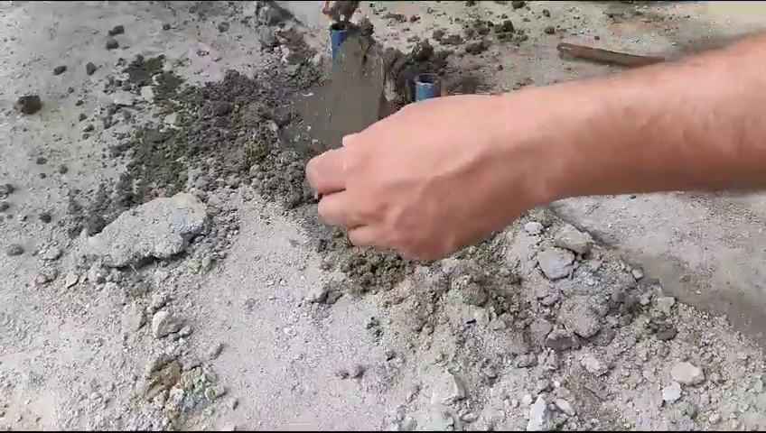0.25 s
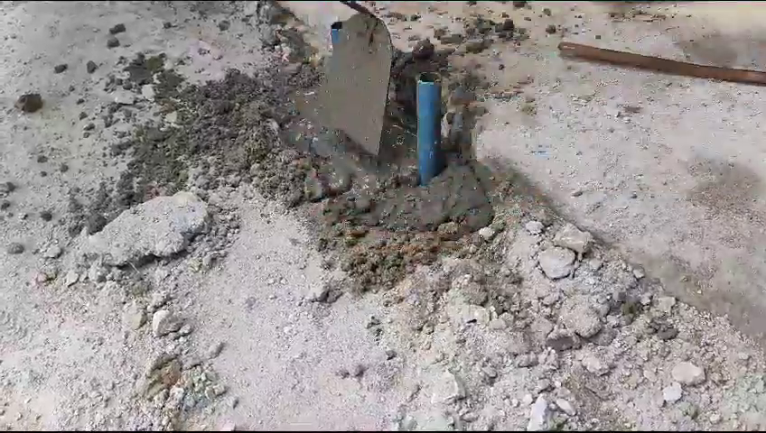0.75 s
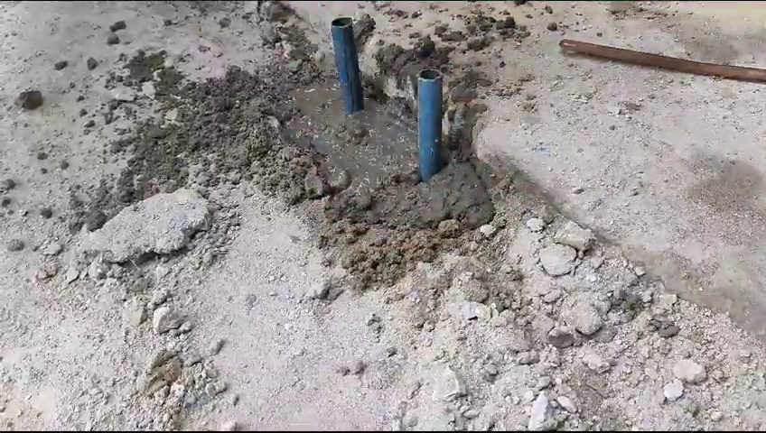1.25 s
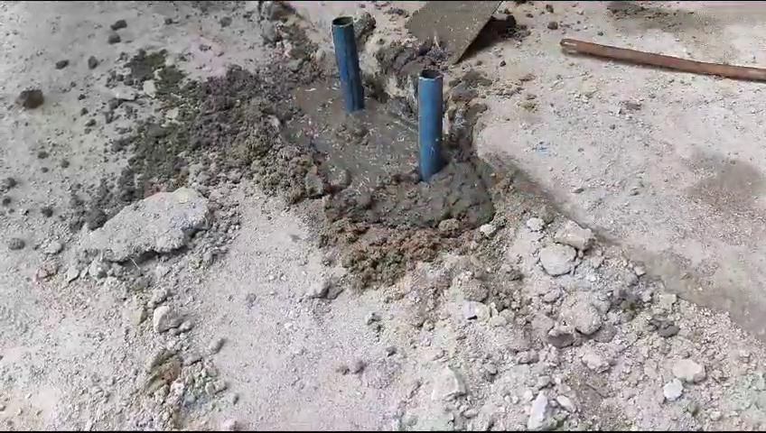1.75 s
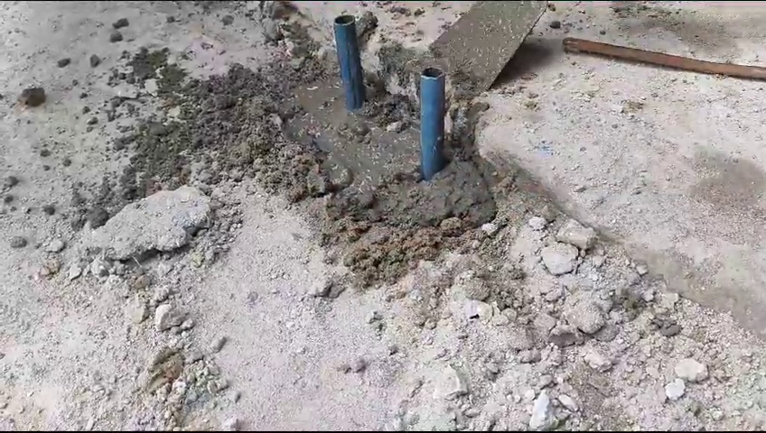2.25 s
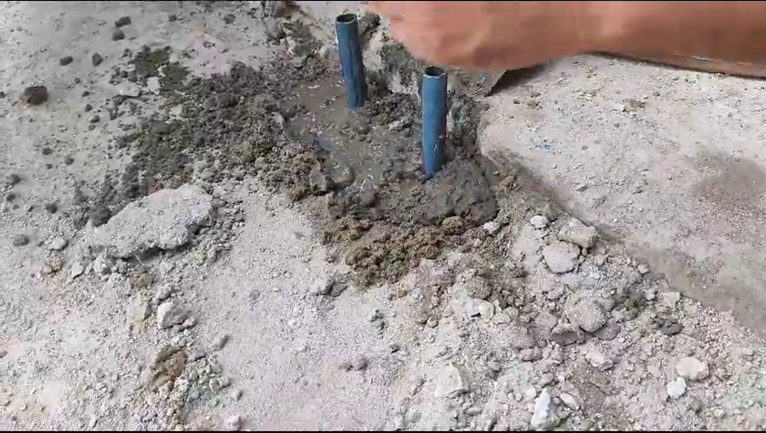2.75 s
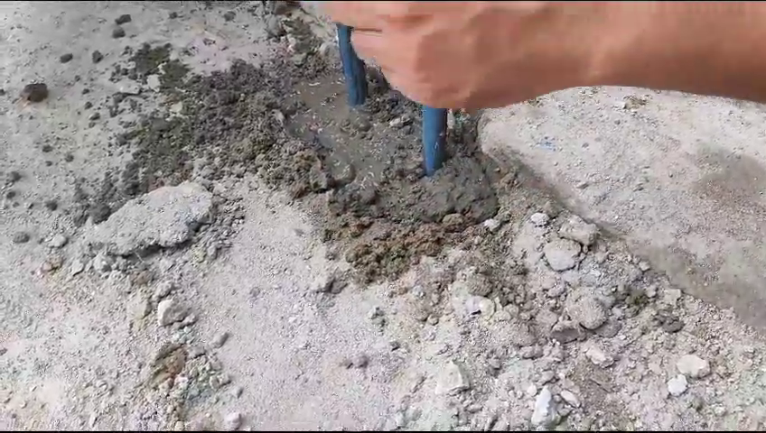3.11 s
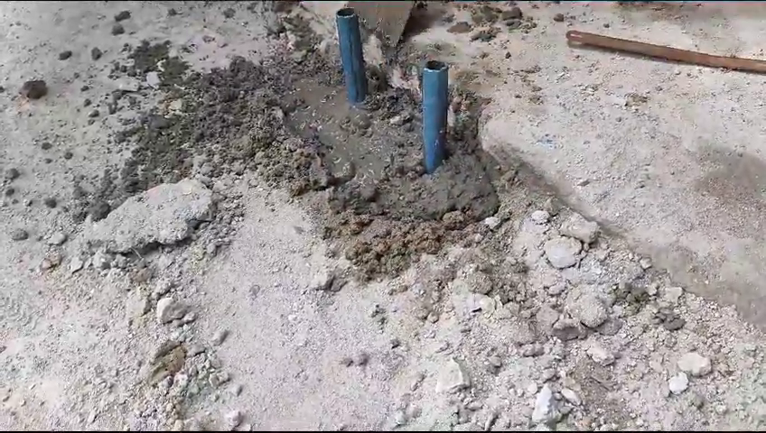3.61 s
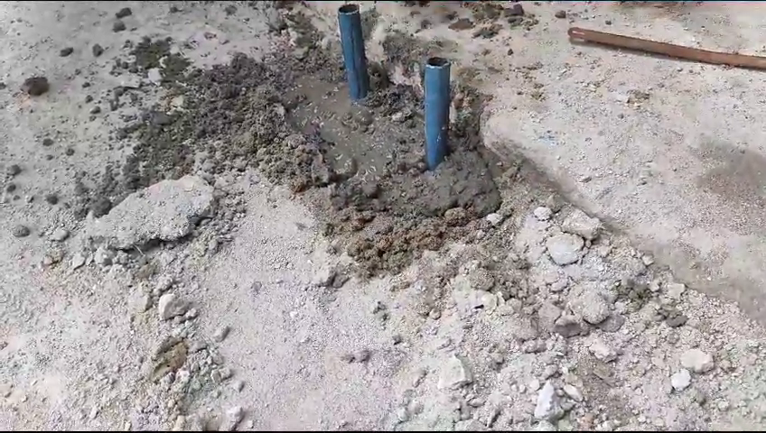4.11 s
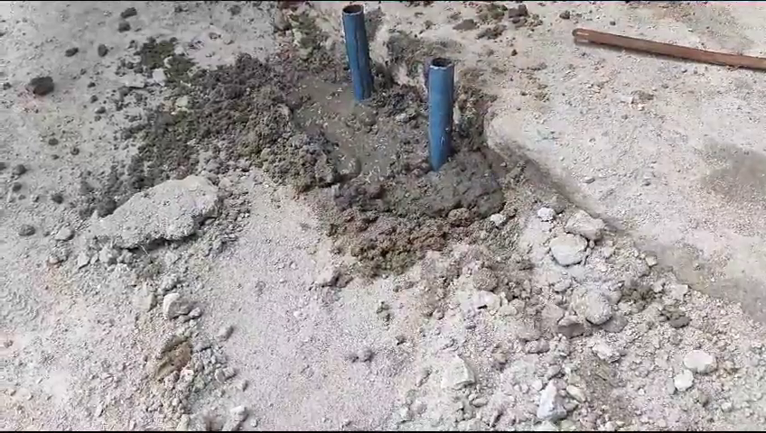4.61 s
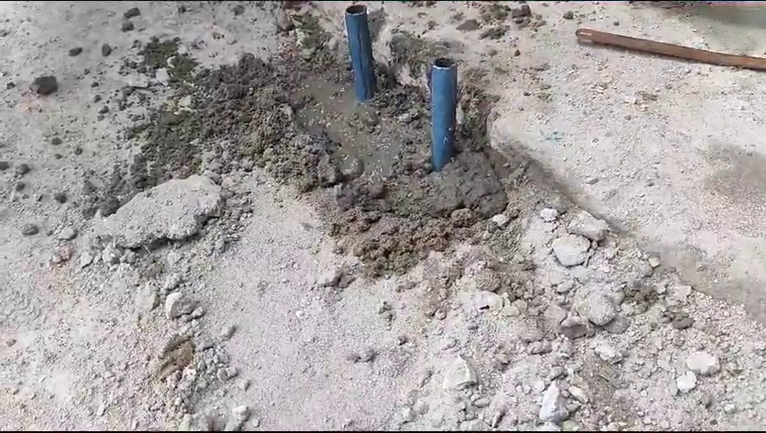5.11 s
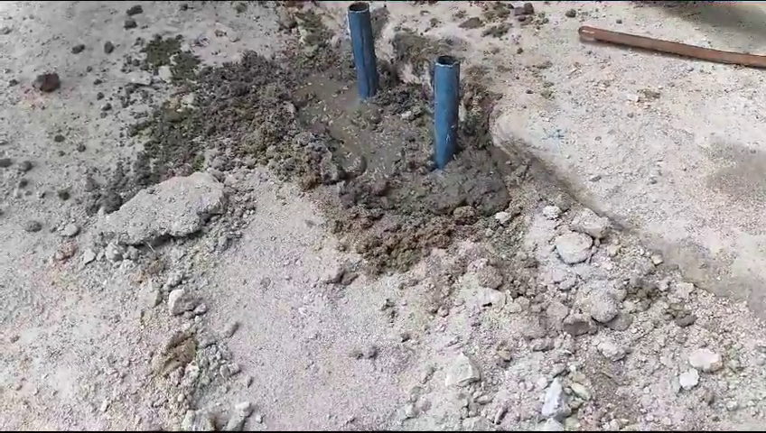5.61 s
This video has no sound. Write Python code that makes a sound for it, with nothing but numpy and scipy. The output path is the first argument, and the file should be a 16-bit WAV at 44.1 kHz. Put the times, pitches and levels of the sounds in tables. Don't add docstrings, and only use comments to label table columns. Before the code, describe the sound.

Close view of a small steel trowel in a bare, lightly echoing room. Short wet crunches pack mortar, then dry gritty scrapes rasp over concrete and the freed blade rings thinly. Two flat wipes and two quick taps follow, a pause, then a heavy drag and knocking digs. Low air rumble sits mostly right, small case ticks left.

```python
import sys
import numpy as np
from scipy import signal
from scipy.fft import rfft, irfft, next_fast_len
from scipy.io import wavfile
from scipy.ndimage import uniform_filter1d, map_coordinates

SR = 44100
rng = np.random.default_rng(int(sys.argv[2]) if len(sys.argv) > 2 else 0)


def materialize(psi):
    bounded = np.clip(np.atleast_2d(psi).T, -1, 1)
    quanta = np.round(bounded * 32767).astype(np.int16)
    wavfile.write(sys.argv[1], SR, quanta)


def voltage_ratio(decibels):
    exponent = np.asarray(decibels, float) / 20
    return 10 ** exponent


N = 258426

# start_s, end_s
SPELLS = [
    (0, 1.48),
    (1.38, 2.57),
    (2.477, 3.29),
    (3.19, 3.86),
    (3.863, 4.63),
    (4.584, 5.1),
    (5.015, 5.86),
]
# frequency_hz, density_db (per Hz)
GRIT_SCRAPE = [(180, -52), (300, -16), (455, -26), (555, -24.5), (842, -17.5), (2700, -9), (3830, -15),
               (4450, -26), (6410, -13), (7690, -8.5), (9390, -16.5), (12500, -17.5), (16000, -16.5)]
# frequency_hz, density_db (per Hz)
GRIT_DIG = [(180, -16.5), (300, 3), (392, -16), (624, -3.5), (1060, -43), (1510, 0.5), (1840, -13),
            (2360, -1), (3890, -14), (5520, -6.5), (8200, -9.5), (11900, -26.5), (16000, -18)]
# frequency_hz, width_hz, level_db
PRESSED_LOW = [(577, 39, -5), (690, 32, -11.5), (1230, 540, -13.5)]
PRESSED_DB = [-4.5, -3.5]


def unit(x):
    return x / np.sqrt(np.mean(abs(x) ** 2) + 1e-20)


def along(points, hz):
    f, v = np.transpose(points)
    return np.interp(np.log(hz + 1), np.log(f + 1), v)


def curves(rows, t):
    s, *cols = np.transpose(rows)
    return [np.interp(t, s, c) for c in cols]


def wobble(rate, size=N):
    knots = rng.standard_normal(int(size * rate / SR) + 4)
    return map_coordinates(knots, [np.arange(size) * rate / SR], order=2)


def filtered(x, response):
    n = x.shape[-1]
    m = next_fast_len(n + SR // 4)
    return irfft(rfft(x, m) * response(np.fft.rfftfreq(m, 1 / SR)), m)[..., :n]


def shape(spectrum):
    grid = np.linspace(0, SR / 2, num=4000)
    mean_power = np.mean(voltage_ratio(2 * along(spectrum, grid)))
    return lambda hz: voltage_ratio(along(spectrum, hz)) / np.sqrt(mean_power)


def above(edge_hz):
    return lambda f: (1j * f / (1j * f + edge_hz)) ** 2


def modes(table, edge_hz=200):
    def response(f):
        total = 0
        for k, (centre, width, db) in enumerate(table):
            total = total + (-1) ** k * voltage_ratio(db) * 1j * f * width / (centre * centre - f * f + 1j * f * width)
        return unit(above(edge_hz)(f) * total)
    return response


def played(rows, t, swell, spared=0.):
    s, rise, hold, peak_db, fall = np.transpose(rows)[:, :, None]
    age = t - s
    rising_db = -20 * swell * np.log10(np.clip(age / abs(rise), 1e-3, 1))
    drop_db = rising_db + abs(fall) * np.clip(age - abs(rise) - abs(hold), 0, None)
    return (voltage_ratio(2 * (peak_db - (1 - spared) * drop_db)) * (age > 0)).sum(axis=0)


def patchy(size, patch_db):
    z = signal.stft(rng.standard_normal((2, size + 256)), nperseg=256)[2]
    field = uniform_filter1d(rng.standard_normal(z.shape[1:]), size=3, axis=0)
    field = uniform_filter1d(field, size=15, axis=1)
    return unit(signal.istft(z * voltage_ratio(patch_db * unit(field)), nperseg=256)[1][:, :size])


def hush():
    # frequency_hz, density_db (per Hz)
    hush_colour = [(120, -49), (200, -44), (519, -15), (696, 1), (1100, -18), (1620, 9.5), (2100, 7),
                   (3200, 7.5), (4350, -4.5), (5420, 7.5), (9580, -9), (10700, -10), (16000, -9)]
    # time_s, level_db
    hush_level = [(0, -74), (1.1, -70), (1.35, -68), (1.55, -55), (1.9, -67.5), (3.1, -67.5), (3.8, -73),
                  (4.25, -64), (4.42, -69.5), (4.55, -72), (5.86, -55.5)]
    # frequency_hz, width_hz, level_db
    pipe_modes = [(700, 22, -8), (1585, 47, 16), (2920, 110, -19)]
    # time_s, level_db
    pipe_level = [(0, -92), (3.6, -104), (4.0, -65), (4.4, -79.5), (4.55, -83), (5.86, -76)]
    t = np.arange(N) / SR
    sand = voltage_ratio(curves(hush_level, t)[0] + wobble(6.5)) * filtered(patchy(N, patch_db=1.0), shape(hush_colour))
    pipes = filtered(rng.standard_normal((2, N)), modes(pipe_modes))
    return sand + voltage_ratio(curves(pipe_level, t)[0]) * pipes


def rumble():
    # start_s, rise_s, hold_s, peak_db, fall_db_per_s
    puff_rows = [(-.02, 0.018, .001, -47.5, 47), (.15, 0.065, .001, -47.5, 73),
                 (.37, 0.058, .001, -49.5, 240.5), (.49, 0.062, .001, -49, 87),
                 (.7, 0.088, 0.29, -53.5, 93), (1.34, 0.091, .02, -43, 115),
                 (1.53, 0.021, 0.0018, -43, 140), (1.62, 0.068, .001, -53.5, 50),
                 (1.95, 0.13, .001, -53.5, 143), (2.28, 0.11, 0.16, -51, 394),
                 (2.58, 0.08, .001, -54.5, 79), (2.84, 0.053, 0.00061, -58.5, 75),
                 (3.21, 0.1, .001, -52, 267), (3.39, 0.063, .001, -60, 57), (3.65, 0.3, .001, -57, 30),
                 (4.58, 0.15, .001, -52, 108), (5.02, 0.51, 0.31, -67, 157)]
    # frequency_hz, density_db (per Hz)
    air_colour = [(12, -31), (20, -7.5), (97, 3), (131, -1), (230, -16), (340, -23), (570, -120)]
    lumps = voltage_ratio(2.7 * np.array([wobble(45), wobble(11)]))
    air = unit(lumps * filtered(rng.standard_normal((2, N)), shape(air_colour)))
    coarse = np.arange(0, N, 64) / SR
    floor = voltage_ratio(2 * -80)
    puffs = np.interp(np.arange(N) / SR, coarse, np.sqrt(played(puff_rows, coarse, swell=1.7) + floor))
    return air * puffs * voltage_ratio([[-4.5], [5.5]])


def bite_power(bites, t):
    power, age = np.zeros(len(t) + SR), np.arange(SR // 5) / SR
    onset = 1 - np.exp(-age / .0002)
    crack = 2 * voltage_ratio(-120 * age / .012)
    for s, db, t60 in bites:
        crunch = voltage_ratio(-120 * age / max(t60, .01))
        power[round((s - t[0]) * SR):][:len(age)] += voltage_ratio(2 * db) * (crunch + crack) * onset
    return power[:len(t)]


def trowel(spell, strokes, bites, grit, low, grip_db, rough_db, patch_db, swell, low_db, bite_low_db,
           lingers, ring_db, choked):
    # frequency_hz, width_hz, level_db
    blade_modes = [(2190, 45, -2), (2680, 140, -4), (3400, 70, -8), (4110, 60, -9), (4790, 110, -6.5),
                   (5250, 150, -11), (5650, 200, -10), (6930, 70, -8), (7600, 160, -5), (8000, 120, -7),
                   (8750, 80, -7), (10550, 120, -11), (11300, 200, -14), (12900, 170, -20),
                   (14900, 250, -17)]
    first, last = round(spell[0] * SR), round(spell[1] * SR)
    t = np.arange(first, last) / SR
    size = len(t)
    crunch = voltage_ratio(-30.0) * bite_power(bites, t)
    clumps = 0.4 * wobble(46.07, size) + 0.6 * wobble(170, size) + 0.6 * wobble(700, size)
    slips = unit(voltage_ratio(rough_db * clumps))
    ending = np.clip((t[-1] - t) * 20, 0, 1) ** 2

    def bed(spared):
        return slips ** 2 * voltage_ratio(-7.0) * played(strokes, t, swell, spared) * ending

    force = np.sqrt(bed(0) + crunch) * patchy(size, patch_db)
    ring = np.sqrt(bed(-choked) + crunch) * voltage_ratio(ring_db) * patchy(size, patch_db + 0.86)
    weight_power = bed(lingers) * voltage_ratio(2 * low_db) + crunch * voltage_ratio(2 * bite_low_db)
    weight = np.sqrt(weight_power) * patchy(size, patch_db)
    blade = np.array(blade_modes, dtype=float)
    blade[:2, 2] += grip_db
    sound = filtered(force, shape(grit))
    sound += filtered(weight, modes(low, edge_hz=240))
    sound += filtered(ring, modes(blade))
    return np.pad(sound, ((0, 0), (first, N - last)))


def packing(spell):
    # start_s, rise_s, hold_s, peak_db, fall_db_per_s
    strokes = [
        (0, 0.00051, 0.00089, -46.5, 147),
        (0.139, 0.047, .001, -42.5, 173),
        (0.394, 0.0072, 0.019, -34.5, 450),
        (0.443, 0.045, 0.00104, -51, 183),
        (0.651, 0.0018, .001, -42.5, 205),
        (0.714, 0.17, 0.00079, -44, 620),
        (0.876, 0.043, 0.00097, -43, 129),
    ]
    # start_s, peak_db, t60_s
    bites = [
        (0.175, -18.5, 0.085),
        (0.1852, -18, 0.024),
        (.266, -34.5, 0.069),
        (0.399, -34, 0.069),
        (0.6584, -14.5, 0.087),
        (0.9044, -22, 0.22),
    ]
    # frequency_hz, density_db (per Hz)
    grit = [(180, -15.5), (300, -10), (470, -27), (546, -22), (814, -7), (1060, -3.5), (1930, -5),
            (2790, -2), (3950, -8.5), (7820, -4), (15000, -20.5), (16000, -59)]
    # frequency_hz, width_hz, level_db
    low = [(525, 410, 2.5), (615, 100, 10), (1030, 69, -14), (2000, 1660, -4.5)]
    return trowel(spell, strokes, bites, grit, low, [-3, -1], rough_db=2.0, patch_db=3.0,
                  swell=0.83, low_db=-6.0, bite_low_db=-38.0, lingers=0.4, ring_db=-4.5, choked=0.44)


def knocks():
    # start_s, peak_db, pitch_hz, upper_pitch_hz, upper_db
    knock_rows = [
        (.18, -20.5, 283, 530, -17),
        (5.344, -16, 225, 560, -13),
        (4.76, -18, 188, 720, -24.5),
        (5.316, -4.5, 207, 525, -12),
        (5.328, -33.5, 189, 615, 14),
        (5.38, -19, 205, 525, 6),
        (5.424, -32.5, 290, 667, 18),
        (5.775, -14.5, 277, 700, -7),
    ]
    # start_s, rise_s, hold_s, peak_db, fall_db_per_s
    thud_rows = [
        (4.583, 0.023, 0.25, -42.5, 37),
        (5.02, 0.033, 0.17, -47.5, 400),
        (5.28, 0.074, .001, -42.5, 117),
        (5.58, 0.079, 0.00053, -51, 251),
        (5.69, 0.096, .001, -52, 201),
    ]
    # frequency_hz, density_db (per Hz)
    heap_colour = [(53, -29), (90, -6), (123, -4), (188, 2), (295, -9.5), (420, -10), (550, -9.5),
                   (920, -120)]
    out, t = np.zeros(N + SR), np.arange(SR // 4) / SR
    for s, db, hz, upper_hz, upper_db in knock_rows:
        upper = np.sin(2 * np.pi * upper_hz * t) + 0.25 * np.sin(2 * np.pi * 1.4 * upper_hz * t)
        swing = np.sin(2 * np.pi * hz * t) + voltage_ratio(upper_db) * upper
        out[round(s * SR):][:len(t)] += voltage_ratio(db - 3.5 - 60 * t * hz / 8.6) * swing
    lumps = voltage_ratio(-2.5 + 1.0 * wobble(40))
    shifting = np.sqrt(played(thud_rows, np.arange(N) / SR, swell=1.3)) * lumps * rng.standard_normal(N)
    return filtered(out[:N], above(edge_hz=340)) + filtered(shifting, shape(heap_colour))


def ticks():
    # start_s, peak_db, pitch_hz, top_db (re peak), snap_share
    tick_rows = [
        (1.172, -38, 4500, -6, 2),
        (1.2308, -52, 4880, -13, 8.4),
        (1.408, -47, 2580, -23, 1.8),
        (1.425, -45.5, 2120, -31, 1.5),
        (1.508, -42.5, 2220, -22, 0.37),
        (1.517, -41, 2500, -35, 0.93),
        (1.5764, -34, 2700, -25, 1.8),
        (1.774, -36, 6500, -32, 1.2),
        (1.923, -43, 4670, -28, 0.72),
    ]
    out, t = np.zeros(N + SR), np.arange(SR // 50) / SR
    for s, db, hz, top_db, snap in tick_rows:
        ring = np.sin(2 * np.pi * hz * t) * voltage_ratio(-60 * t / .006)
        crack = snap * np.exp(-t * 11000) * np.cos(2 * np.pi * 4500 * t)
        top = voltage_ratio(top_db - 60 * t / 0.0079) * np.sin(2 * np.pi * 15000 * t)
        out[round(s * SR):][:len(t)] += voltage_ratio(db) * (ring + crack + top)
    return filtered(out[:N], above(edge_hz=1500)) * voltage_ratio([[5.5], [-5.5]])


def scraping(spell):
    # start_s, rise_s, hold_s, peak_db, fall_db_per_s
    strokes = [(1.39, 0.42, 0.0007, -52, 100), (1.6, 0.067, 0.01, -46.5, 400),
               (1.688, 0.034, .001, -41, 350), (1.719, 0.033, .001, -39, 600),
               (1.759, 0.0036, .001, -49, 211), (1.837, 0.015, .001, -50.5, 800),
               (1.864, 0.015, .001, -50, 403), (1.973, 0.0074, 0.00091, -64, 500),
               (1.995, 0.076, .001, -41, 170), (2.299, 0.045, 0.00079, -38, 368),
               (2.4, 0.054, .001, -59, 400)]
    # start_s, peak_db, t60_s
    bites = [(1.639, -33, 0.31), (1.6721, -17.5, 0.0067), (1.754, -28, .012), (1.711, -26, 0.014),
             (1.7325, -23, 0.032), (1.659, -32, .01), (1.699, -26.5, 0.028), (2.001, -28, 0.41),
             (2.032, -24.5, 0.08), (2.048, -26, 0.072), (2.1501, -28, 0.035), (2.304, -25, 0.083),
             (2.3428, -31, 0.042)]
    return trowel(spell, strokes, bites, GRIT_SCRAPE, PRESSED_LOW, PRESSED_DB, rough_db=4.5, patch_db=-0.5,
                  swell=1.45, low_db=-4.5, bite_low_db=-10, lingers=0.087, ring_db=4.0, choked=0.011)


def catches():
    # start_s, peak_db, pitch_hz, rise_s, t60_s
    catch_rows = [(1.5, -60, 717, 0.021, 0.56), (1.57, -55.5, 700, 0.011, 0.38),
                  (1.924, -48.5, 1220, 0.00085, 0.014), (2.57, -32, 4730, 0.0037, .08),
                  (2.598, -31.5, 4830, .006, 0.076), (2.625, -35, 2220, 0.019, 0.11),
                  (2.63, -31, 4870, 0.013, 0.11), (2.662, -34, 4800, 0.0067, .1),
                  (2.687, -31.5, 4790, .006, 0.12), (2.713, -24, 7850, .003, 0.037),
                  (2.925, -33, 4810, 0.0059, 0.15), (2.66, -25, 2190, 0.011, 0.064),
                  (2.684, -41, 1110, 0.0044, 0.028), (2.692, -47, 2320, 0.0057, 0.064),
                  (2.789, -44, 1086, 0.0043, 0.21), (2.82, -36, 2180, 0.0082, 0.36),
                  (2.825, -44.5, 1100, 0.006, 0.19), (3.864, -34.5, 1580, 0.0027, 0.08),
                  (4.0281, -27, 615, 0.0018, 0.03), (4.0275, -31, 1560, 0.0022, 0.043),
                  (4.233, -56, 950, 0.0035, 0.051), (4.234, -62, 390, 0.0024, 0.054),
                  (4.55, -49.5, 2420, 0.0046, 0.01), (4.612, -30.5, 614, 0.0026, 0.046),
                  (4.585, -31, 1557, 0.005, 0.13), (4.606, -31, 1555, .01, 0.088),
                  (4.69, -25, 1538, 0.0071, 0.16), (4.719, -17, 1460, 0.012, 0.034),
                  (4.741, -27, 1230, 0.01, 0.028), (5.043, -19.5, 1544, 0.0016, 0.02),
                  (5.057, -31.5, 1794, 0.0046, 0.072), (5.291, -34.5, 1470, 0.0036, 0.042),
                  (5.379, -20, 1530, 0.0017, 0.02), (5.407, -24, 1427, 0.0049, 0.05),
                  (5.545, -39, 3280, .002, 0.027), (5.632, -30.5, 1536, 0.0048, 0.064),
                  (5.712, -34, 2616, 0.0049, 0.094), (5.733, -26, 1603, 0.0068, 0.016),
                  (5.742, -25.5, 1442, 0.0093, 0.062), (5.744, -24, 2073, 0.0063, 0.057),
                  (5.768, -24.5, 1580, 0.0039, 0.028),
                  (1.68, -50, 544, 0.0056, .15), (1.75, -46.5, 550, 0.018, 0.15),
                 (2.572, -42, 1100, 0.0017, 0.066), (2.705, -41.5, 586, 0.0073, 0.16),
                 (2.715, -43, 1090, 0.0072, 0.095), (2.945, -42, 1078, 0.01, 0.087),
                 (3.265, -37.5, 558, 0.011, 0.13), (3.296, -45, 576, 0.0094, 0.26),
                 (3.508, -37, 588, 0.0075, 0.14), (3.575, -44.5, 568, 0.019, 0.18),
                 (3.548, -38, 1620, .004, 0.02), (3.298, -40, 2680, .004, .05),
                 (3.866, -41, 555, 0.0041, 0.054), (4.77, -36.5, 192, 0.015, 0.13)]
    out, t = np.zeros(N + SR), np.arange(SR // 6) / SR
    for s, db, hz, rise, t60 in catch_rows:
        growth = np.minimum(t / abs(rise), 1) ** 2
        body = growth * voltage_ratio(-60 * np.clip(t - abs(rise), 0, None) / abs(t60))
        phase = 2 * np.pi * hz * t + 0.94 * wobble(116.4, len(t))
        out[round(s * SR):][:len(t)] += voltage_ratio(db) * body * np.sin(phase)
    return out[:N]


def ringing(spell):
    # start_s, rise_s, hold_s, peak_db, fall_db_per_s
    strokes = [(2.483, 0.0016, 0.00057, -49, 350), (2.566, 0.012, .001, -44.5, 700),
               (2.591, 0.013, .001, -41.5, 550), (2.615, 0.048, .001, -38.5, 700),
               (2.64, 0.04, .001, -33, 900), (2.68, 0.0076, 0.024, -37, 850),
               (2.727, 0.0071, .001, -44.5, 254), (2.783, 0.0077, .001, -39.5, 550),
               (2.8, 0.031, .001, -43.5, 108), (2.903, 0.014, .001, -38, 200),
               (2.92, 0.024, .001, -36.5, 300), (2.96, 0.029, .001, -44, 346)]
    # start_s, peak_db, t60_s
    bites = [(2.482, -34, 0.016), (2.5714, -27, 0.064), (2.632, -21, 0.027), (2.675, -24, 0.02),
             (2.7135, -40, 0.016), (2.789, -26.5, 0.031), (2.8313, -48, 0.023), (2.862, -27.5, 0.025),
             (2.904, -23.5, 0.052), (2.915, -33, 0.034), (2.94, -34, .03)]
    # frequency_hz, width_hz, level_db
    low = [(569.4, 19.5, -2.5), (1094, 31, -2)]
    tip_db = [-4, -12]
    return trowel(spell, strokes, bites, GRIT_SCRAPE, low, tip_db, rough_db=3.5, patch_db=3.0,
                  swell=0.26, low_db=-4.5, bite_low_db=-12.0, lingers=0.17, ring_db=0.5, choked=0.11)


def wiping(spell):
    # start_s, rise_s, hold_s, peak_db, fall_db_per_s
    strokes = [
        (3.199, 0.031, .001, -55.5, 500),
        (3.241, 0.0032, 0.093, -41.5, 216),
        (3.486, 0.032, 0.03, -41.5, 203),
    ]
    # start_s, peak_db, t60_s
    bites = [
        (3.2436, -30.5, 0.048),
        (3.2543, -22.5, 0.062),
        (3.3, -30, 0.036),
        (3.357, -31, 0.023),
        (3.487, -31, 0.35),
        (3.5085, -20, 0.026),
        (3.519, -22.5, 0.061),
        (3.54, -26, .04),
        (3.563, -27, 0.038),
    ]
    return trowel(spell, strokes, bites, GRIT_SCRAPE, PRESSED_LOW, PRESSED_DB, rough_db=3.0, patch_db=3.0,
                  swell=0.68, low_db=-6.0, bite_low_db=-24.0, lingers=0.28, ring_db=4.0, choked=0.014)


def tapping(spell):
    # start_s, rise_s, hold_s, peak_db, fall_db_per_s
    strokes = [
        (3.864, 0.0017, 0.0025, -35.5, 245),
        (3.92, 0.045, .001, -55.5, 80),
        (4.025, 0.0041, 0.0011, -39.5, 202),
        (4.09, 0.0088, 0.026, -61.5, 90),
    ]
    # start_s, peak_db, t60_s
    bites = [
        (3.8703, -23.5, 0.043),
        (4.0302, -19.5, 0.073),
        (4.068, -33, 0.13),
        (4.2348, -45, 0.064),
    ]
    # frequency_hz, density_db (per Hz)
    grit = [(1060, -25), (1800, -5), (3810, -7.5), (4170, -10), (4530, -16), (6650, -7.5), (7770, -7),
            (10500, -13.5), (12500, -19), (15000, -6), (16000, -5)]
    # frequency_hz, width_hz, level_db
    low = [(560, 550, -1), (850, 340, -2), (1260, 470, -4.5), (1580, 85, -6)]
    return trowel(spell, strokes, bites, grit, low, [-4, -8], rough_db=4.0, patch_db=0.7,
                  swell=0.8, low_db=0.0, bite_low_db=-12, lingers=0.043, ring_db=-2.0, choked=0.37)


def dragging(spell):
    # start_s, rise_s, hold_s, peak_db, fall_db_per_s
    strokes = [
        (4.584, 0.0056, 0.074, -48, 350),
        (4.629, 0.068, .001, -35, 493),
        (4.685, 0.0083, .001, -36, 144),
        (4.713, 0.012, 0.0044, -30, 900),
        (4.74, 0.01, .001, -60, 250),
        (4.74, 0.14, 0.0011, -56, 28),
    ]
    # start_s, peak_db, t60_s
    bites = [
        (4.5864, -19.5, 0.56),
        (4.666, -14, 0.13),
        (4.679, -22, 0.12),
        (4.697, -14.5, 0.17),
        (4.729, -20, 0.037),
    ]
    # frequency_hz, width_hz, level_db
    low = [(615, 106, -4.5), (1250, 290, -1), (1403, 110, 0.5), (1505, 560, -6)]
    return trowel(spell, strokes, bites, GRIT_DIG, low, [-3, -5], rough_db=1.0, patch_db=3.0,
                  swell=0.79, low_db=2.0, bite_low_db=-27, lingers=0.57, ring_db=-8.5, choked=0.75)


def digging(spell):
    # start_s, rise_s, hold_s, peak_db, fall_db_per_s
    strokes = [
        (5.015, 0.0047, 0.17, -44.5, 64.5),
        (5.286, 0.014, 0.00068, -37.5, 62.6),
        (5.391, 0.0097, .001, -34, 204),
        (5.614, 0.0043, 0.0017, -38, 84.5),
        (5.691, 0.066, 0.0011, -32.5, 198),
    ]
    # start_s, peak_db, t60_s
    bites = [(5.02, -22.5, 0.12), (5.04, -19, 0.12), (5.0583, -18, 0.13), (5.186, -23.5, 0.072),
             (5.3147, -20, 0.037), (5.379, -19, 0.037), (5.416, -15, 0.14), (5.5494, -35, 0.05),
             (5.6161, -19, 0.096), (5.735, -16, 0.033), (5.744, -18.5, 0.053), (5.769, -26, 0.056)]
    # frequency_hz, width_hz, level_db
    low = [(510, 96, 0), (615, 80, 3), (950, 810, -7.5), (1148, 28, 1.5), (1460, 920, -8.5)]
    return trowel(spell, strokes, bites, GRIT_DIG, low, [3, -6], rough_db=1.0, patch_db=4.0,
                  swell=0.57, low_db=0.5, bite_low_db=-0.5, lingers=0.32, ring_db=-7.5, choked=0.38)


def room(x):
    # frequency_hz, t60_s
    wall_decay = [(200, 0.019), (600, 0.27), (2000, 0.43), (8000, 0.037), (15000, 0.017)]
    hz, t, z = signal.stft(rng.standard_normal((2, SR // 2)), SR, nperseg=256)
    decay = voltage_ratio(-60 * t / along(wall_decay, hz)[:, None])
    tail = signal.istft(z * decay, SR, nperseg=256)[1]
    delayed = np.pad(x, (300, 0))[None]
    return signal.fftconvolve(delayed, tail / np.linalg.norm(tail[0]), axes=1)[:, :N]


def ports(pair, lag_s):
    # frequency_hz, likeness (left to right, 0 to 1)
    likeness = [(100, 0.9), (400, 1), (700, 0.83), (1400, 0.37), (3000, 0.069), (8000, 0.045),
                (15000, 0.053)]
    # frequency_hz, difference_db (left minus right)
    balance = [(300, 0), (700, -2.5), (1200, 2.5), (3300, 5), (5500, 7), (6800, 6.5), (8000, -10.5),
               (9500, -5.5), (11000, -2.5), (15000, 5.5)]

    def rotation(hz):
        turn = np.arccos(np.clip(along(likeness, hz), 0, 1)) / 2
        return np.array([np.cos(turn), np.sin(turn)])

    def port_response(hz):
        sides = np.array([[1], [-1]])
        return voltage_ratio(sides * along(balance, hz) / 2) * np.exp(-1j * np.pi * sides * hz * lag_s)

    mid, side = filtered(pair, rotation)
    return filtered(np.array([mid + side, mid - side]), port_response)


def scene():
    pack, scrape, ring, wipe, tap, drag, dig = SPELLS
    work = packing(pack) + scraping(scrape) + ringing(ring) + wiping(wipe)
    work += tapping(tap) + dragging(drag) + digging(dig)
    work[0] += knocks() + catches()
    heard = ports(work + hush(), lag_s=.00006) + voltage_ratio(-14.0) * room(work[0])
    return heard + rumble() + ticks()


def low_pass(x):
    return signal.sosfilt(signal.butter(12, 16970, fs=SR, output="sos"), x)


def record(dry):
    mic = filtered(dry, lambda hz: hz < 15900)
    return low_pass(mic)


dry = scene()
out = record(dry)
materialize(out)
```